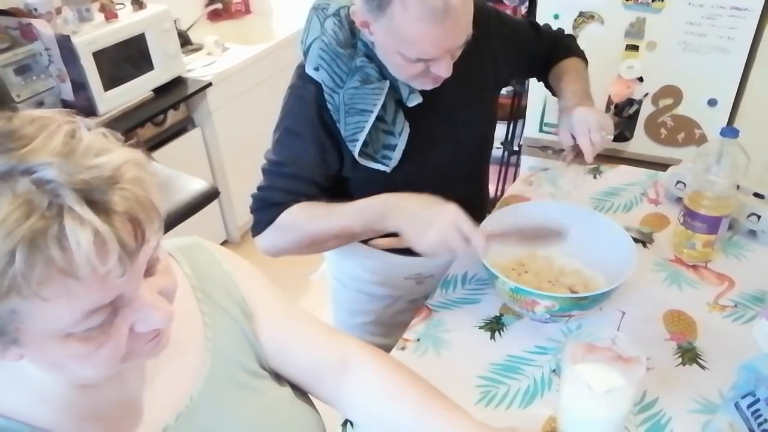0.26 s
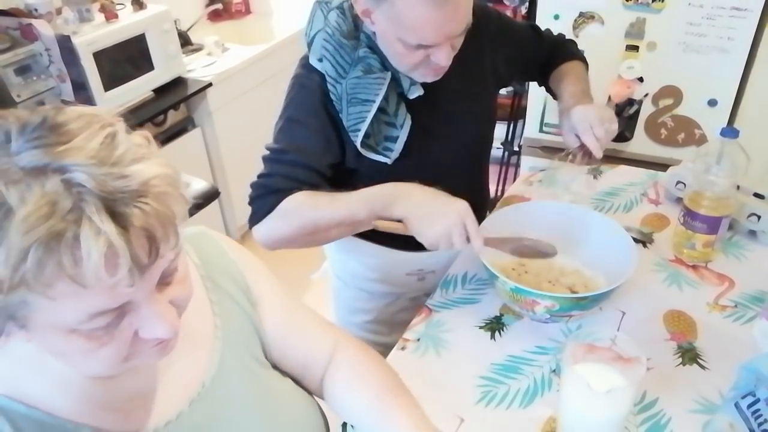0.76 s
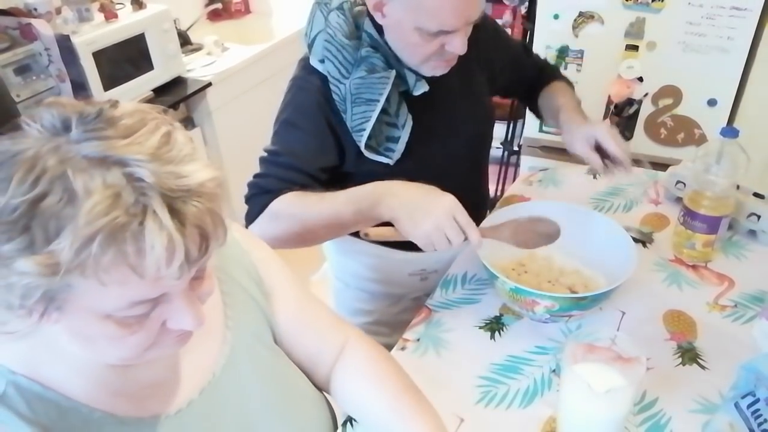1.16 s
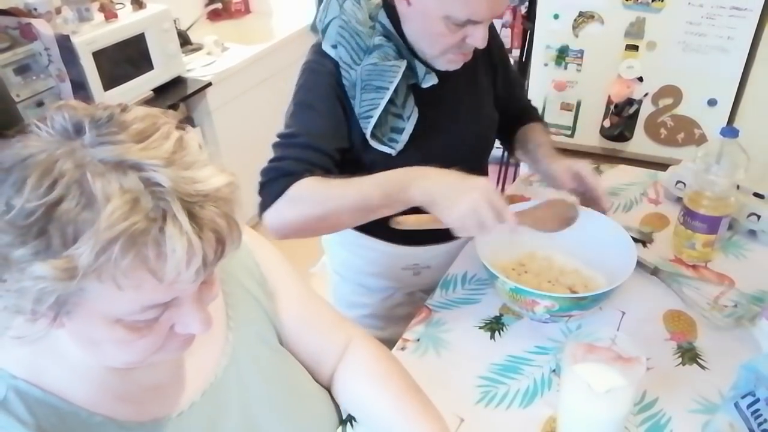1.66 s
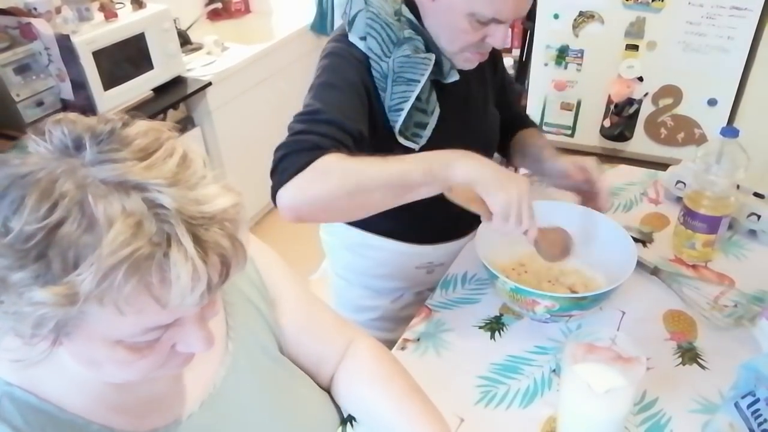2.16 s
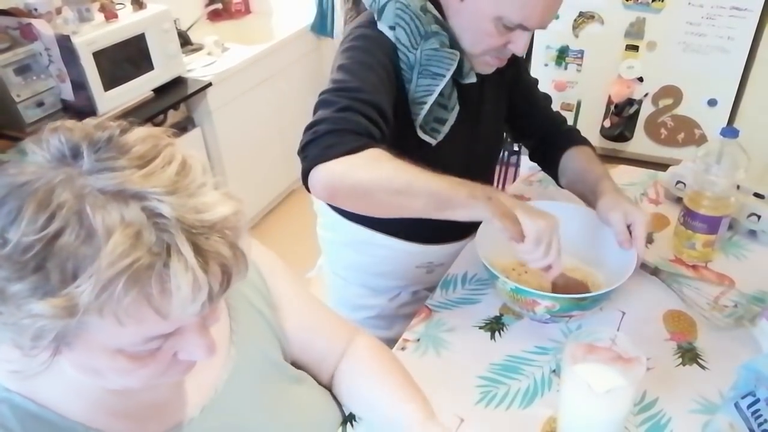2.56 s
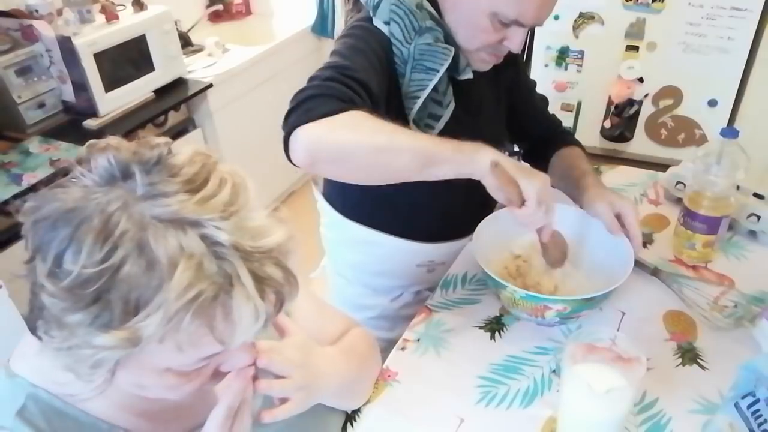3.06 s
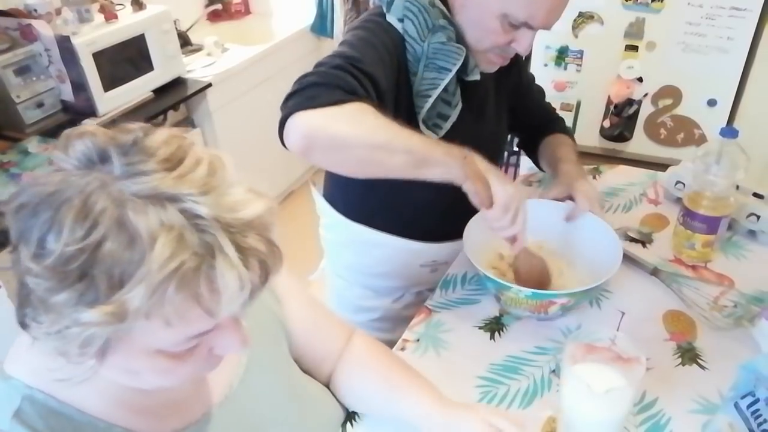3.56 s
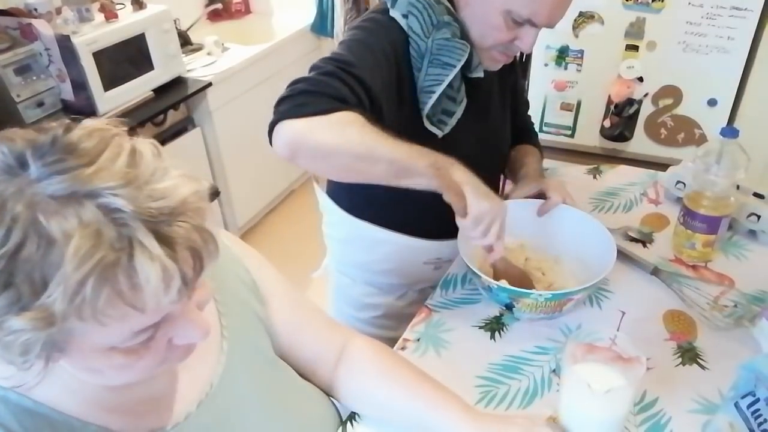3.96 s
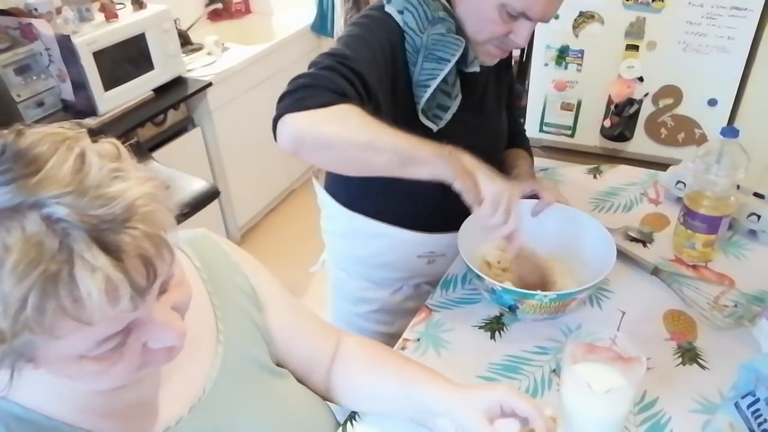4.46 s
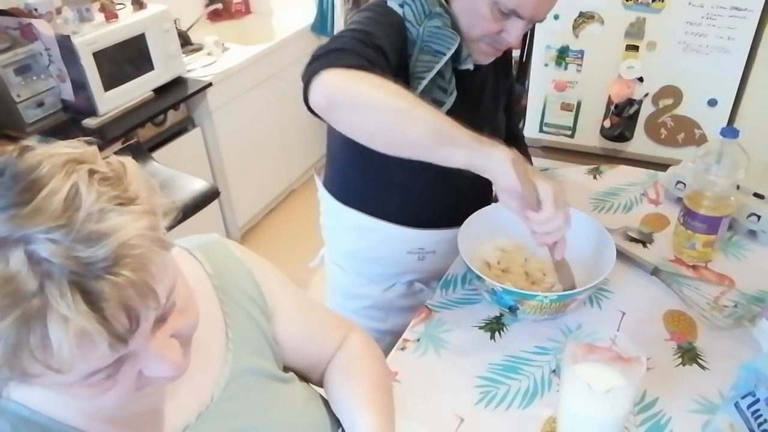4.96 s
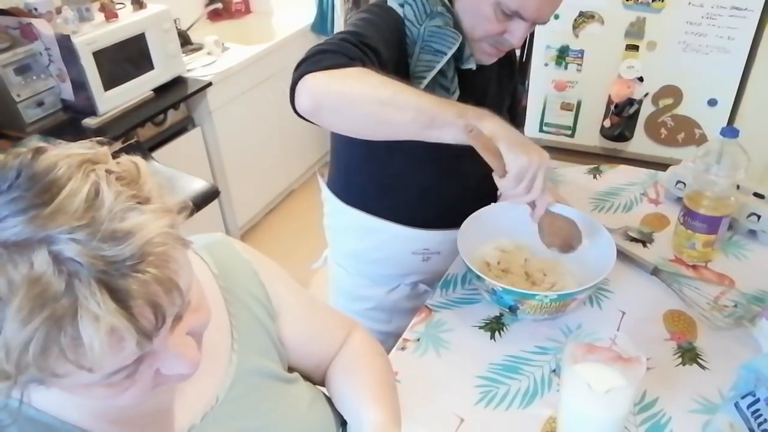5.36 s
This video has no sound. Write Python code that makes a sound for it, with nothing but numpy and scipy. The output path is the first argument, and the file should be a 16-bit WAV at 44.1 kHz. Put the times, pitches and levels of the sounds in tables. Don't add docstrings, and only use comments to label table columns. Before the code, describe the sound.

In a small bright kitchen, light rim taps and wrapper crackle lead to a utensil clattering on the table, then a wooden spoon knocks and scrapes a bowl.

```python
import sys
import numpy as np
from scipy import signal
from scipy.fft import rfft, irfft, next_fast_len
from scipy.io import wavfile
from scipy.ndimage import uniform_filter1d

SR = 44100
rng = np.random.default_rng(int(sys.argv[2]) if len(sys.argv) > 2 else 0)


def log_audio(samples):
    frames = np.atleast_2d(samples).T
    limited = np.clip(frames, -1, 1)
    pcm = np.round(limited * 32767).astype(np.int16)
    wavfile.write(sys.argv[1], SR, pcm)


def gain_from_db(level_db):
    decades = np.asarray(level_db, float) / 20
    return 10 ** decades


N = 246519
T = np.arange(N) / SR
CLICK_LAG = 0.22


def unit(x):
    return x / np.sqrt(np.mean(x ** 2, axis=-1, keepdims=True))


def peak(x):
    return x / np.abs(x).max()


def shape(x, points):
    hz, db = np.transpose(points)
    f = np.maximum(np.fft.rfftfreq(x.shape[-1], 1 / SR), 1)
    gain = gain_from_db(np.interp(np.log(f), np.log(hz), db))
    return irfft(rfft(x) * gain, x.shape[-1])


def band(x, lo_hz, hi_hz):
    edges = [lo_hz, min(hi_hz, .45 * SR)]
    return signal.sosfilt(signal.butter(2, edges, "band", fs=SR, output="sos"), x)


def walk(rate_hz):
    k = int(SR / min(rate_hz, 80))
    steps = rng.standard_normal(size=512)[:N // k + 1]
    return unit(uniform_filter1d(np.repeat(steps, k), k)[:N])


def swell(start, length):
    u = np.clip((T - start) / length, 0, 1)
    rise_share = 0.44
    return np.sin(np.pi * u ** (np.log(.5) / np.log(rise_share))).clip(0)


def add(out, s, x, peak_db, pan_db, lag=0.52):
    x = peak(x)
    for channel, side in enumerate((1, -1)):
        i = int(s * SR - side * lag * pan_db)
        out[channel, i:i + len(x)] += x[:N - i] * gain_from_db(peak_db + side * pan_db / 2)


def ring(modes, extra_db, spread_db, seconds):
    hz, db, t60 = np.array(modes).T[:, :, None]
    level_luck, pitch_luck = rng.standard_normal((2, len(hz), 1))
    t = np.arange(int(seconds * SR)) / SR
    fade = np.exp(-np.log(1000) * t / t60)
    tones = np.sin(2 * np.pi * hz * (1 + 0.0073 * pitch_luck) * t)
    return (gain_from_db(db + extra_db + spread_db * level_luck) * fade * tones).sum(axis=0)


def contact(ms, count):
    t = np.arange(int(.03 * SR)) / SR
    chatter = rng.standard_normal((count, len(t))) * np.exp(-1000 * t / ms)
    chatter[:, 0] = 2.82
    return chatter


def crack(hz, dull_db, crisp_db, ms, dull_hz):
    burst = np.pad(contact(ms, count=3), ((0, 0), (0, int(.03 * SR))))
    t_ms = 1000 * np.arange(burst.shape[1]) / SR
    near_db, near_ms = -20, 5
    burst = burst + gain_from_db(near_db) * rng.standard_normal(burst.shape) * np.exp(-t_ms / near_ms)
    pitched = band(burst[0], 0.65 * hz, 1.296 * hz)
    dull = band(band(burst[1], dull_hz, 4800), dull_hz, 8500)
    crisp = band(burst[2], 9450, 14600)
    return peak(pitched) + gain_from_db(dull_db) * peak(dull) + gain_from_db(crisp_db) * peak(crisp)


def snaps(events, dull_hz, pan_db, pan_per_octave):
    out = np.zeros((2, N))
    for s, db, hz, dull_db, crisp_db in events:
        x = crack(hz, dull_db, crisp_db, 1.0, dull_hz)
        add(out, s, x, db, pan_db + pan_per_octave * np.log2(hz / 6000), CLICK_LAG)
    return out


KNOCK_SPOTS = {2.412: [-3, 0, -3, 2, -3, 1, -5.5, -0.5, 3.5, 6, -7, 3.5], 3.758: [-3, -11, 1, 0, -9, -2, -5,
               1.5, 0.5, -4, -24, -3], 4.277: [-16, -3, 7.5, 2, -6, 11, -26, -3, 6, 13.5, -3, -5], 4.99:
               [3.5, -2, -20, -2, 2, 2, -5, 8, 2.5, -5, 3, 3]}


def blows(events, modes, edge_hz, knock_db, rim_hz, pan_db, low_hz):
    out = np.zeros((2, N))
    low = modes[:, 0] < 1300
    hz = modes[low, :1]
    push_s = 0.00023
    for s, db, thump_db, upper_db, rim_db in events:
        region_db = np.select([hz < 300, hz < 700], [thump_db, 0], upper_db)
        wall = ring(modes[low], region_db + np.c_[KNOCK_SPOTS.get(s, 0)], 1, .2)
        rim = ring(modes[~low], rim_db, 1, .2)
        touch = contact(.3, count=1)[0]
        touch = np.pad(touch, (0, len(wall) - len(touch)))
        scale = gain_from_db(knock_db) * np.abs(wall).max()
        knock_parts = (175, 305, thump_db + 9), (320, 666, 0), (700, 1282, upper_db + 0.5)
        for lo, hi, part_db in knock_parts:
            wall += scale * gain_from_db(part_db) * peak(band(touch, lo, hi))
        rim += scale * gain_from_db(rim_db - 2.0) * peak(band(band(touch, *rim_hz), *rim_hz))
        wall *= 1 - np.exp(-np.arange(len(wall)) / (push_s * SR))
        soft_hz = max(edge_hz * gain_from_db(0.04 * min(upper_db, 0)), 400)
        wall = band(band(wall, low_hz, soft_hz), 0.46 * low_hz, 0.89 * soft_hz)
        rim = band(rim, 0.6 * rim_hz[0], 7800)
        add(out, s + 0.0011, -wall - rim, db, pan_db)
    return out


# (frequency [Hz], density [dB per Hz])
HUM_COLOUR = [(25, 1), (100, -3.5), (225, -10.5), (367, -4.5), (900, -17.5), (1500, -15.5), (3000, -28),
              (16000, -38)]
# (start [s], length [s], level [dB])
LEANS = [
    (0.53, 0.32, -63),
    (1.466, 0.2, -68),
    (1.866, 0.81, -66.5),
    (3.16, 0.54, -60.5),
    (4.17, 0.35, -55.5),
    (4.482, 0.41, -49.5),
    (5.067, 0.36, -66.5),
]


def household():
    mid, side, low = rng.standard_normal((3, N))
    side = shape(side, [(100, -7), (500, -7.0), (1500, 2)])
    hum = gain_from_db(-66 + walk(0.7)) * unit(shape(np.array([mid + side, mid - side]), HUM_COLOUR))
    load = gain_from_db(-65.5)
    for s, length, db in LEANS:
        load = load + gain_from_db(db) * swell(s, length)
    shake = load * gain_from_db(2. * walk(28)) * unit(band(band(low, 34, 190), 39, 140))
    return (hum + shake) * gain_from_db(np.array([[-2.2], [2.2]]))


# (start [s], length [s], hiss level [dB], wood part [dB re hiss], bowl part [dB re hiss])
STROKES = [(0.0, 0.23, -64, -13, -18), (0.132, .05, -58.5, 0.5, -23), (0.14, 0.12, -59.5, -7, -23),
           (0.504, 0.087, -55, -2, -30), (0.745, 0.13, -78, 20.5, -11), (0.962, 0.33, -62.5, 11, -20),
           (1.355, 0.25, -60, 8.5, 1), (1.622, 0.39, -86.5, 17, 29.5), (1.9, 0.63, -83.5, 5, 22),
           (2.399, 0.13, -66, 10, -11), (2.583, 0.11, -62, 3.5, 10), (2.64, 0.18, -58.5, 4.5, 7.5),
           (2.781, 0.089, -59.5, 3, 9), (2.777, 0.25, -52.5, 5.5, 2), (1.01, 0.053, -47, 4, -24),
           (3.04, 0.83, -73.5, 7.5, 15.5), (3.355, 0.18, -74.5, 15.5, 7), (3.558, 0.16, -62.5, -14, -14),
           (3.715, 0.39, -62, 4.5, 4.5), (4.058, 0.25, -73.5, 5.5, 13.5), (4.332, 0.17, -60, 6.5, 7.5),
           (4.503, 0.14, -64, -8, 6.5), (4.583, 0.17, -48, -7, -12), (4.713, 0.14, -50, -12, -8.5),
           (4.736, .025, -43.5, -12, -20), (4.785, 0.015, -49, -21, -20), (4.822, 0.043, -48.5, -9, -9),
           (4.826, 0.17, -49, -12.5, -15), (3.247, .1, -80, 14, -5), (3.438, 0.075, -86, 10, 15),
           (4.99, 0.36, -62, 0, 2.5), (5.308, 0.24, -59, -19, 3)]


def rubbing():
    gains = 0
    for s, length, db, wood_db, bowl_db in STROKES:
        gains = gains + swell(s, length) * gain_from_db(db + np.array([[0], [wood_db], [bowl_db]]))
    hiss_gain, wood_gain, bowl_gain = gains
    slips = rng.standard_normal((3, 2, N)) * gain_from_db(2.5 * rng.exponential(size=(3, 1, N)).clip(0, 4))
    slips = slips[:, :1] + 7.4 * slips
    grip = 1.5 * walk(30)
    hiss = hiss_gain * gain_from_db(grip + walk(38)) * unit(band(slips[0], 5840, 18000))
    wood = wood_gain * gain_from_db(grip + 1.7 * walk(40)) * unit(band(slips[1], 1200, 4320))
    hollow = band(slips[2], 538, 730)
    hollow = hollow + 0.47 * band(slips[2], 827, 1303) + 0.41 * band(slips[2], 180, 410)
    bowl = bowl_gain * gain_from_db(1.85 * walk(24)) * unit(hollow)
    pan_db = -3
    return (hiss + wood + bowl) * gain_from_db(np.array([[pan_db], [-pan_db]]) / 2 - 12.0)


# (time [s], peak level [dB], crack pitch [Hz], dull part
# [dB], crisp part [dB])
CREASES = [(0.043, -55.5, 6600, 7, -8), (0.1382, -52, 7470, -4, -4), (0.9878, -29, 5080, -20, -14),
           (0.9905, -36, 5000, -6, -5), (1.0219, -36.5, 5900, 10, -3), (1.0245, -31.5, 6500, 15, 9),
           (1.0268, -33, 5950, -3, 9), (1.0368, -31, 7500, 5, 6), (1.043, -46, 5500, -6, -6),
           (1.049, -29, 6050, -15, 5.5), (1.0536, -36.5, 6120, -14, 7), (1.059, -46, 6000, -16, -5),
           (1.066, -41, 6500, -15, -2), (1.0784, -33, 7450, -38, 4.5), (1.0853, -31, 5000, -17.5, -4.5),
           (1.0945, -45, 5550, -23, -2), (1.1545, -37, 7460, -10, 0.5), (1.1697, -30, 7130, -21.5, 2),
           (1.1757, -28, 5760, -5, 2), (1.2085, -33.5, 5560, -25, 1), (1.3694, -53.5, 7700, 12, 10),
           (1.3838, -49, 6600, -5.5, 3), (1.393, -46.5, 5700, -4, -9), (1.401, -50, 6000, -4, -1),
           (1.407, -41, 6000, 6, -17), (1.4097, -29.5, 6500, -5, 0.5), (1.4342, -30.5, 6100, -0.5, 6.5),
           (1.4362, -38, 5500, -4.5, -11.5), (1.4812, -43, 6400, -22.5, 0), (1.4972, -42, 5760, -15.5, 2)]


def wrapper_crackle():
    return snaps(CREASES, dull_hz=800, pan_db=-3, pan_per_octave=9)


# (time [s], peak level [dB], pitch [Hz], t60 [s])
THUDS = [(0.12, -57.5, 91.7, 0.3), (0.429, -61, 159, 0.08), (0.597, -47, 63, 0.22), (0.739, -56, 134, 0.06),
         (0.873, -52.5, 104.4, 0.34), (1.34, -56, 98, 0.16), (1.933, -45.5, 94.8, 0.2),
         (2.138, -55, 107, 0.12), (3.281, -39.5, 203, 0.12), (3.735, -43, 210, 0.29),
         (4.384, -36, 91.8, 0.24)]


def thuds():
    out = np.zeros((2, N))
    t = np.arange(int(.4 * SR)) / SR
    for s, db, hz, t60 in THUDS:
        x = ring([(hz, 0, t60), (1.6 * hz, -10, .7 * t60)], 0, 1, .4)
        add(out, s, x * (1 - np.exp(-t / 0.0011)), db, -3)
    return out


# (start [s], length [s], start pitch [Hz], end pitch [Hz], level [dB])
HUMS = [(0.177, 0.23, 349.6, 357, -69), (0.531, 0.1, 434, 438, -74.5), (1.833, 0.14, 372, 385, -64.5),
        (1.97, 0.21, 857, 842, -75.5), (1.98, 0.1, 360, 340, -66), (2.232, 0.13, 327, 359, -72.5),
        (1.025, 0.023, 730, 694, -69), (1.172, 0.056, 726, 740, -79), (2.72, 0.04, 4820, 4700, -75)]


def vessel_hums():
    out = np.zeros((2, N))
    for s, length, hz0, hz1, db in HUMS:
        u = np.arange(int(length * SR)) / (length * SR)
        cycles = length * (hz0 * u + (hz1 - hz0) * u ** 2 / 2)
        envelope = np.sin(np.pi * u) ** 0.52 * gain_from_db(2.9 * walk(60)[:len(u)])
        add(out, s, envelope * np.sin(2 * np.pi * cycles), db + 6.5, -3)
    return out


# (time [s], peak level [dB], crack pitch [Hz], dull part [dB], ring [dB])
TAPS = [
    (0.2451, -37, 5100, -13, -39),
    (0.2484, -31, 5100, -8, -26),
    (0.5125, -34, 4360, -32, -30.5),
    (0.7545, -31, 4640, -19, -35),
]
# (frequency [Hz], width [Hz], level [dB])
RIM_PLACES = [
    [(1620, 54, 5.5), (2880, 48, -23), (3120, 41, -17), (4740, 40, -6), (5270, 130, -8), (5900, 220, -15),
     (6160, 94, -19), (6800, 92, -20), (7200, 100, -24), (7480, 47, -9), (8480, 48, -1), (8670, 39, -3),
     (9000, 30, -4), (9500, 39, -8)],
    [(2860, 27, -2), (2980, 36, 7.5), (3860, 55, 1), (4150, 50, -15), (5080, 61, 11.5), (5170, 19, -9),
     (5230, 41, -19), (6200, 15, -12), (6300, 59, 4), (6500, 39, 1.5), (7000, 32, -4), (7700, 44, 2),
     (8400, 40, -8), (9600, 36, 0)],
    [(3080, 37, -14), (3600, 84, -17), (3900, 160, -2), (4650, 180, 22), (4800, 74, 7), (5100, 160, 12),
     (5790, 160, 15.5), (6100, 60, 8), (7250, 44, 11.5), (8260, 97, 10), (9830, 20, 15.5), (11500, 47, 12),
     (12700, 50, 5), (14500, 50, -7)],
]
RIM_T60_S = (.018, .032, .014)
RIM_SPLIT = .018


def rim_taps():
    out = np.zeros((2, N))
    for (s, db, hz, dull_db, ring_db), place in zip(TAPS, (0, 0, 1, 2)):
        modes = []
        for f, _, level_db in RIM_PLACES[place]:
            modes += [(f * (1 + RIM_SPLIT * k), level_db, RIM_T60_S[place]) for k in (-1, 0, 1)]
        x = gain_from_db(ring_db) * ring(modes, 0.55, 1.0, .1)
        head = crack(hz, dull_db, -24, 0.54, 1200)
        x[:len(head)] += head
        add(out, s, x, db, -1.5, CLICK_LAG)
    return out


# (time [s], peak level [dB], table thump [dB], upper ring [dB], rim ring [dB])
DROPS = [(1.531, -38, -25.5, -9, 6), (1.545, -33, -9, -23, 3.5), (1.587, -10.5, -27, 4.5, 2.5),
         (1.591, -21, -17.5, 4, -26.5), (1.613, -30, -23, 16, 10), (1.629, -34, -20, 9, 3.5),
         (1.641, -31.5, -13.5, -7.5, -22), (1.652, -35, -30, -11, -12), (1.668, -32.5, -34, 6, -26),
         (1.688, -39, -19, -8, -10), (1.7105, -33.5, -13, -9, -12), (1.736, -36, -11.5, -12, -18.5),
         (1.757, -40.5, -25.5, 2, -13), (1.775, -46, -22, 3, -8)]
# (frequency [Hz], level [dB], t60 [s])
UTENSIL_MODES = [(210, -26.5, 0.055), (250, 2, 0.04), (374, -13, 0.021), (459, 15, 0.08), (540, 8, 0.03),
                 (643, 16.5, 0.025), (740, 12, 0.022), (856, 18, 0.047), (965, 10.5, 0.032),
                 (1168, 14, 0.03), (1380, 13.5, 0.025), (1480, -13, .02), (1557, 14.5, 0.073),
                 (1786, 8, 0.047), (1950, 12, 0.019), (2170, 1, 0.03), (2490, -5, 0.025),
                 (2500, -20, 0.0079), (3530, -15, 0.013), (4250, 6.5, 0.034), (5000, -4, 0.011),
                 (5560, -1.5, 0.011)]


def dropped_utensil():
    modes = np.minimum(UTENSIL_MODES, [SR, 17, .09])
    return blows(DROPS, modes, edge_hz=3100, knock_db=-4.0, rim_hz=(1300, 2500), pan_db=-6, low_hz=180)


# (time [s], peak level [dB], table thump [dB], upper ring [dB], rim ring [dB])
KNOCKS = [(1.944, -52, 29, -9, -21), (2.412, -23, -18, -17, -35), (3.344, -44, 17.5, -46, 18.5),
          (3.376, -49, 10, -20, -1), (3.758, -22, -18.5, -13.5, -26.5), (3.83, -36.5, 0, -17, -24),
          (4.277, -29, -13.5, -9, -35), (4.385, -32, 4.5, -17, -22), (4.44, -44, -3, -24, -14),
          (4.479, -44.5, 26, -24, -30), (4.614, -48, 2, -38, -28), (4.641, -43, -6, -28, -12),
          (4.661, -41.5, 6, -48, -8), (4.687, -33, 44, -63, -44), (4.99, -24, -24, 0.5, -54)]
# (frequency [Hz], level [dB], t60 [s])
BOWL_MODES = [(110, 10.5, 0.11), (159, -51, 0.036), (248, 13.5, 0.092), (248, -8, 0.14), (327, -25, 0.04),
              (419.6, 6, 0.025), (456, -0.5, 0.028), (570, 1, 0.018), (646, -1, 0.013), (780, 2.5, 0.028),
              (860, 10, 0.02), (1047, 5.5, 0.026), (1320, -14, 0.022), (2040, -6, 0.033), (2216, 19, 0.033),
              (2340, 10.5, 0.012), (2720, -9, 0.03), (3123, 5.5, 0.038), (3220, -23, 0.03)]


def knocked_bowl():
    modes = np.minimum(BOWL_MODES, [SR, 9, .07])
    return blows(KNOCKS, modes, edge_hz=1000, knock_db=-11.0, rim_hz=(1900, 3600), pan_db=-5, low_hz=70)


# (time [s], peak level [dB], crack pitch [Hz], dull part [dB], crisp part [dB])
THREADS = [(1.947, -55, 6770, -16, 0), (3.3488, -44, 6300, 5.5, 2), (3.3815, -47, 6020, -23, -3),
           (4.1082, -51, 5460, -2, 4), (4.365, -49, 7200, 14, -4), (4.3853, -43.5, 5230, 4, -12),
           (4.7455, -55, 7700, -6, -10), (4.8288, -55, 6200, -5, -6), (5.0408, -29.5, 9460, -9, 8),
           (5.2284, -47, 6700, -13, -9), (5.3368, -30, 5800, -11, -17), (5.4126, -30, 6000, -14, -4),
           (5.4435, -30.5, 7600, -18, 3), (5.4915, -26, 5900, -1.5, -7.5), (5.4975, -46, 5600, 25, -13),
           (5.3425, -53, 6000, -9, -18), (5.5515, -56, 9000, -9, 14)]


def batter_threads():
    return snaps(THREADS, dull_hz=1900, pan_db=-4, pan_per_octave=3.7)


# (frequency [Hz], t60 [s])
WALLS = [(100, 0.35), (500, 0.18), (2000, 0.28), (6000, 0.24), (14000, 0.17)]


def kitchen(x):
    t = np.arange(int(.6 * SR)) / SR
    hz, t60 = np.transpose(WALLS)
    tail = 0
    for f in 60 * 2. ** np.arange(9):
        mid, side = band(rng.standard_normal((2, len(t))), f / np.sqrt(2), f * np.sqrt(2))
        pair = mid + min(f / 900, 1) * side * np.array([[1], [-1]])
        tail = tail + pair * np.exp(-np.log(1000) * t / np.interp(np.log(f), np.log(hz), t60))
    early_db, early_s = -2.5, 0.0097
    tail = tail * (1 + gain_from_db(early_db) * np.exp(-t / early_s))
    for _ in range(4):
        bins = rfft(tail)
        power = np.abs(bins) ** 2
        level = uniform_filter1d(power, size=600) / uniform_filter1d(power, size=18)
        tail = irfft(bins * np.sqrt(level), len(t))
        tail = tail * ((t > .0012) & (t < .5))
    tail = tail / np.sqrt(np.sum(tail ** 2, axis=-1, keepdims=True))
    size = next_fast_len(N + SR)
    return irfft(rfft(x, size) * rfft(tail, size), size)[:, :N]


def scene():
    rub = rubbing() + vessel_hums()
    crackle = wrapper_crackle()
    edge = rim_taps()
    utensil = dropped_utensil()
    bowl = knocked_bowl() + thuds()
    threads = batter_threads()
    to_walls = gain_from_db(-1.0) * rub + gain_from_db(-1.5) * crackle + gain_from_db(5.5) * edge
    to_walls = to_walls + gain_from_db(0.5) * utensil + gain_from_db(4.5) * bowl + gain_from_db(-2.5) * threads
    return household() + rub + crackle + edge + utensil + bowl + threads + kitchen(to_walls)


# (frequency [Hz], level [dB])
MIC = [(30, -5), (70, -3.5), (1000, 1.5), (1400, -6), (2800, 3.5), (4220, -2.5), (5250, 8.5), (7200, 10),
       (10700, -2.5), (13600, -0.5), (14900, 5), (15600, 5.5), (16100, -22.5)]
# (frequency [Hz], level [dB], added at left and taken off at right)
PORTS = [(100, 0.9), (1000, 0.3), (2000, 1), (4000, -2.5), (8000, 4), (12000, 0.5), (15000, -1.5)]


def top_cut(x):
    return signal.sosfilt(signal.butter(12, 16520, fs=SR, output="sos"), x)


def record(dry):
    left, right = shape(dry, MIC)
    left = shape(left, PORTS)
    right = shape(right, np.multiply(PORTS, [1, -1]))
    return top_cut(np.array([left, right]))


dry = scene()
out = record(dry)
log_audio(out)
```